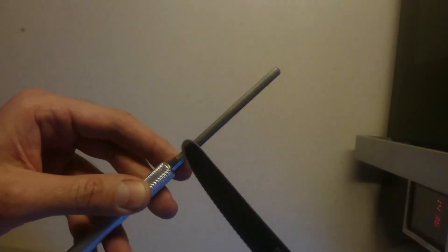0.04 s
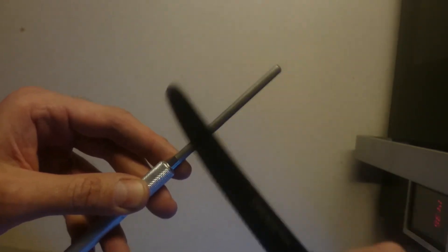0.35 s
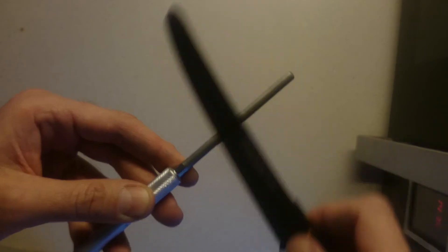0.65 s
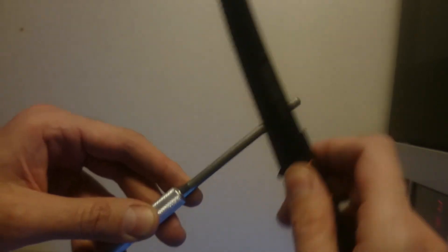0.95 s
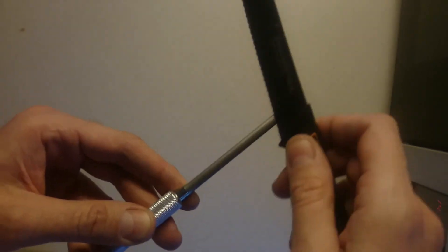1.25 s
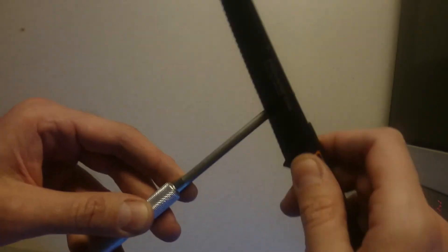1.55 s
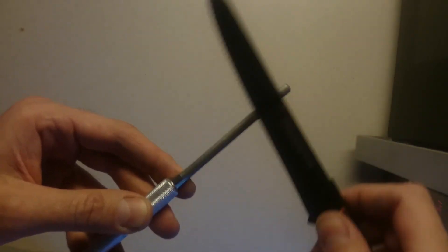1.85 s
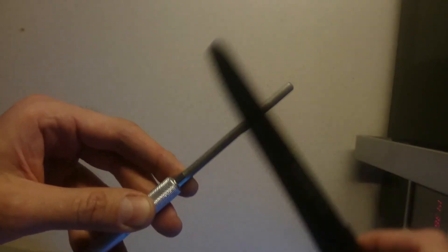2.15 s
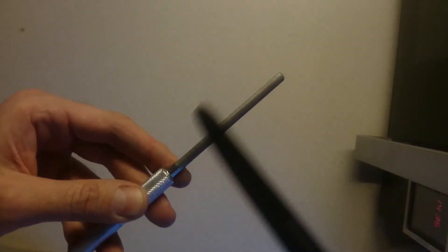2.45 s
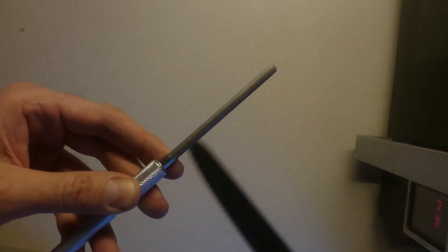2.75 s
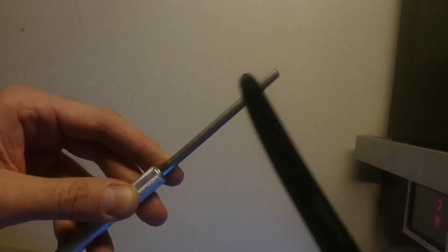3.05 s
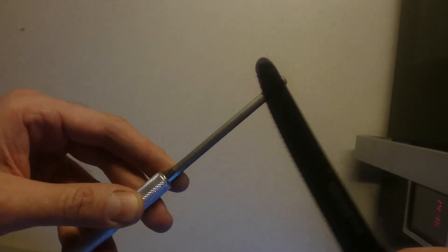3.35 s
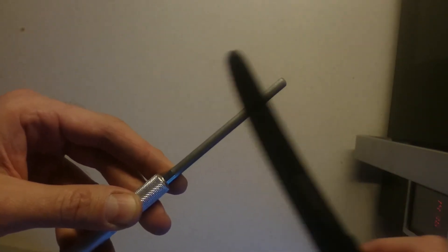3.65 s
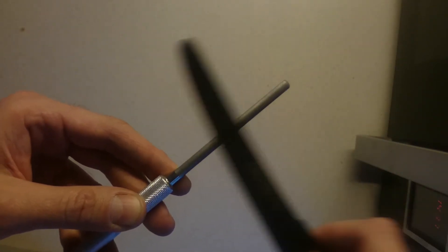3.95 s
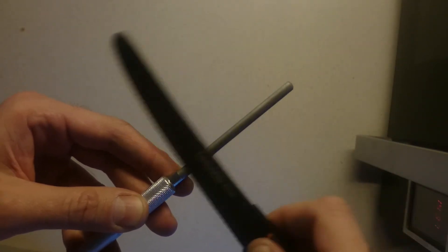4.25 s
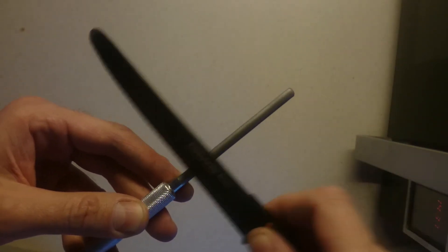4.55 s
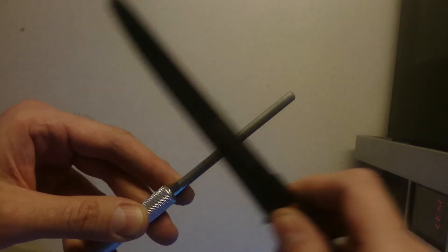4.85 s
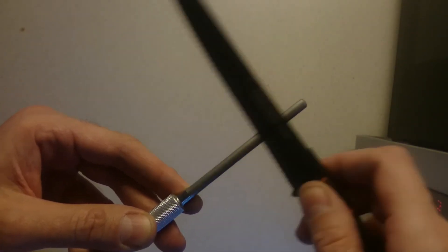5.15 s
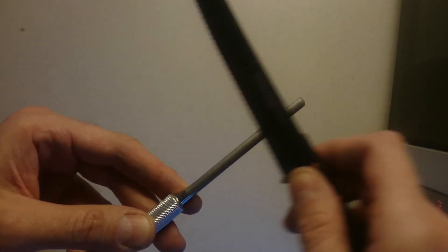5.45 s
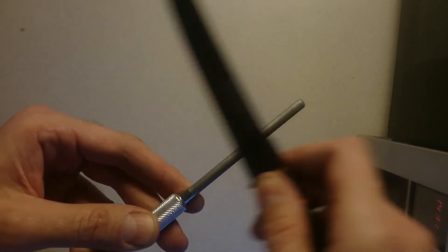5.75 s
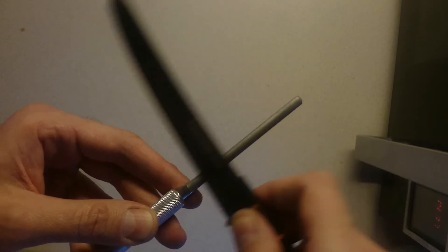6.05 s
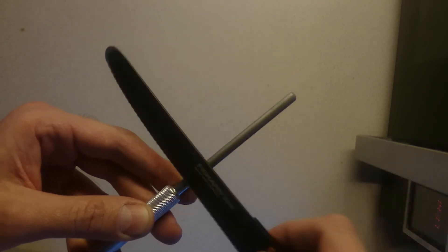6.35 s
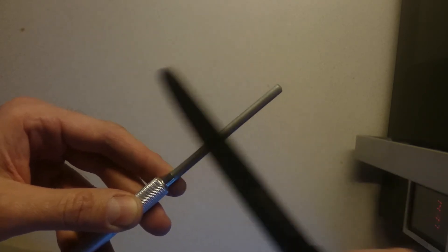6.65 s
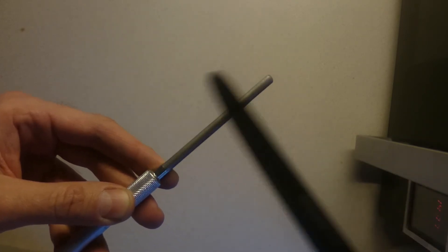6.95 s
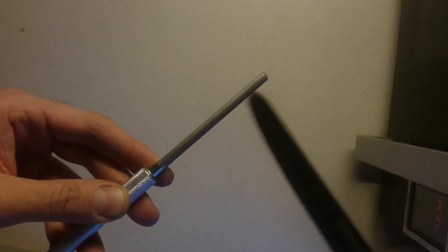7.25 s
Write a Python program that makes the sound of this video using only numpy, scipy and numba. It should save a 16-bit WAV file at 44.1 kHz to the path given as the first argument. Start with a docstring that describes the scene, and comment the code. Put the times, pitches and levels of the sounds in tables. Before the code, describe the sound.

A serrated kitchen knife is drawn over a thin steel sharpening rod in a steady rhythm, about three strokes a second. Each stroke starts with a sharp metallic tap and runs into a short, bright, gritty scrape with faint sliding ring tones. A few times the blade sings on softly. The microphone is close, in a small room with a brief echo, a low motor throb and soft air underneath.

```python
"""In a small room, a serrated kitchen knife is drawn along a thin steel sharpening rod near a phone.
About three times a second the blade lands with a tap, then its teeth and grit rake the rod.
The blade's ringing tones slide in pitch as the contact point moves; a few times one sings on.
The room echoes briefly. Underneath are a low motor throb, soft air and a faint drifting whistle."""
import sys
import numpy as np
from scipy import signal
from scipy.fft import rfft, irfft
from scipy.io import wavfile
from numba import njit

SR = 44100
rng = np.random.default_rng(int(sys.argv[2]) if len(sys.argv) > 2 else 0)


def int16_out(signal):
    """Quantize to a 16-bit WAV file."""
    q = np.round(np.clip(np.atleast_2d(signal).T, -1, 1) * 32767)
    wavfile.write(sys.argv[1], SR, q.astype(np.int16))


N = 331191
TIME = np.arange(N) / SR

# the tones in the motor's throb: (multiple of the turning rate, relative level [dB])
MOTOR_TONES = [(1, -4), (3, -8), (5, 0), (7, -5.5), (9, -10), (11, -19), (13, -21), (15, -14)]
# the tone colour of the room's air: (frequency [Hz], relative level [dB])
AIR_COLOUR = [(25, -3.5), (50, -2.5), (85, -3.5), (170, -12), (300, -14.5), (500, -19.5), (1000, -27),
              (2000, -28.5), (5000, -34), (9000, -42), (15000, -43.5)]
# faint whistles: (start [s], end [s], start pitch [Hz], end pitch [Hz], relative level [dB])
WHISTLES = [(.88, 1.02, 1390, 1470, -58), (1.08, 1.3, 1360, 1060, -63), (2.17, 2.36, 1260, 1530, -66.5),
            (2.48, 2.72, 720, 1090, -64), (2.76, 3.06, 1150, 745, -68), (5.38, 5.52, 1310, 1450, -73),
            (5.6, 5.77, 1600, 2200, -62), (5.87, 6.06, 1210, 1320, -63.5), (6.14, 6.34, 1090, 730, -66)]
# how much the left microphone is favoured over the right: (frequency [Hz], left minus right [dB])
MIC_BALANCE = [(700, 2.5), (950, -6.5), (1250, 9.5), (1650, 0.5), (2400, 3), (3100, 1), (4500, 9),
               (5700, -4.5), (6600, 10.5), (7800, 20), (10500, 17.5), (13300, 14), (15500, 4.5)]
# treble aimed at the phone as the blade turns in the hand: (time [s], treble boost [dB])
BLADE_FACING = [(0, 0), (2.2, 1), (2.7, -3.5), (3.2, -0.5), (3.7, -0.5), (4.25, 4.5), (4.7, 1.5),
                (5.2, 2.5), (5.7, -1.5), (6.2, 4), (6.7, -1), (7.15, -3.5)]
# steady resonances of rod and blade: (pitch [Hz], width [Hz], relative level [dB])
STEEL_RESONANCES = [(1650, 70, 2), (2600, 110, 2), (3100, 110, 0), (3730, 70, 0), (4700, 110, 0),
                    (5060, 70, -1), (5630, 110, 3), (6760, 200, -2), (7860, 170, 0), (8510, 110, 0),
                    (9020, 130, -1), (9940, 250, -2), (11000, 170, -1), (13500, 220, -2)]
# the broad tone colour of the steel: (frequency [Hz], relative level [dB])
STEEL_COLOUR = [(400, -35), (700, -21), (890, -15.5), (1070, -24), (1300, -16), (1700, -10.5), (2300, -9.5),
                (3000, -6.5), (4500, -2), (5700, -0.5), (7800, 2), (10000, 0), (11800, -7.5), (13400, -2),
                (15300, -11)]
# tones left singing as the blade lifts off: (time [s], pitch [Hz], level [dB], time to fade 60 dB [s])
LIFT_RINGS = [(.1, 2100, -58, 1.2), (1.8, 2370, -61, 1.2), (4.3, 1650, -55, .5), (7.2, 2100, -61.5, 2.6),
              (7.2, 4410, -63, 1.4)]
# how fast the blade's bending tone slides, mostly up early on, then down: (time [s], slide [octaves/s])
BEND_SLIDES = [(0, -1), (.7, 1.9), (1.7, 4.5), (2.3, 2), (3.4, -3), (4, -5), (4.7, -3), (5.3, -5.5),
               (6.3, -3.5), (7.2, -3.5)]
# one row per stroke; levels are relative, and fullness is a boost of the lows and mids:
# (landing time [s], tap level [dB], tap's ring pitch [Hz], ring against tap [dB], skid length [s],
#  draw length [s], draw level [dB], skid against draw [dB], fullness [dB], bending pitch [Hz],
#  bending level [dB])
STROKES = [ (-.04, -23, 6500, -11, 0.06, 0.079, -27, -3, 1.5, 1643, -51),
           (.278, -17.5, 7800, -7.5, 0.072, 0.074, -27, -2, 1.5, 1770, -51),
           (.618, -18.5, 6770, -12, 0.066, 0.075, -27, -4.5, 1.5, 1330, -47),
           (0.9508, -21, 6600, -6, .062, 0.086, -27, -11.5, 3.5, 1323, -49),
           (1.259, -12, 6080, -2.5, 0.088, 0.097, -25.5, -14, 2.5, 1283, -48),
           (1.629, -14, 6250, -6, 0.062, 0.096, -25.5, -15.5, 1, 1460, -44),
           (1.9587, -19.5, 4420, -18.5, 0.062, 0.1, -27, -15, 3, 1390, -51),
           (2.2954, -15.5, 5550, -9, 0.063, 0.095, -25.5, -12.5, 1, 1820, -52.5),
           (2.616, -13.5, 6030, -6.5, 0.065, 0.074, -24.5, -6, -0.5, 1920, -55),
           (3.044, -26.5, 4700, -17.5, 0.081, 0.094, -25.5, -18.5, -1, 1807, -53),
           (3.3746, -13, 7230, -2, .055, 0.094, -26, -25, -1, 1777, -56),
           (3.674, -15.5, 5550, -4.5, 0.039, .076, -24, -13, -0.5, 1890, -48.5),
           (3.935, -19.5, 6350, -12, .046, 0.072, -24.5, -38, 1.5, 1382, -55),
           (4.2006, -17, 6950, -3, 0.045, .07, -25, -13, 1, 1408, -55.5),
           (4.4695, -20, 6070, -4, 0.033, 0.073, -27, -15, 3.5, 1373, -50),
           (4.7319, -19, 7500, -5, 0.022, 0.074, -26, -18, 1, 1330, -49.5),
           (4.978, -15.5, 6700, -9, 0.048, 0.054, -26, -9, 0.5, 1240, -50.5),
           (5.217, -22, 5170, -15, 0.059, 0.058, -26.5, -17, -0.5, 1172, -47.5),
           (5.489, -18, 5140, -14, 0.032, 0.062, -27, -13, 0, 1155, -47.5),
           (5.757, -17.5, 6400, -9, 0.031, 0.064, -26, -11, 1, 1148, -47.5),
           (6.024, -22, 6660, -9, 0.035, .061, -29, -12, 2, 1321, -46.5),
           (6.2842, -23, 5700, -6, 0.036, .065, -28.5, -16, 4, 1306, -53),
           (6.54, -20, 6130, -18, 0.04, 0.057, -24, -19.5, 1.5, 1604, -46.5),
           (6.796, -17, 8640, -1.5, 0.034, 0.072, -22, -29, 1, 1763, -51.5),
           (7.078, -18.5, 4530, -6, .035, 0.056, -22, -19, 1, 1780, -58)]

RIGHT_LAG_SAMPLES = 16  # the knife's sound reaches the right microphone this much later


def gain(db):
    """Turn decibels into a number to multiply by."""
    return 10 ** (np.asarray(db) / 20)


def unit_rms(x):
    """Scale a sound so that its average level (rms) is 1."""
    return x / np.sqrt(np.mean(x ** 2))


def unit_energy(x):
    """Scale a sound so that its total energy is 1."""
    return x / np.sqrt(np.sum(x ** 2))


def fade(t, t60):
    """A smooth fade that falls 60 dB in t60 seconds."""
    return np.exp(-np.log(1000) * t / t60)


def add(out, start_s, x):
    """Mix x into out from start_s, dropping what falls outside the scene."""
    i = int(start_s * SR)
    x, i = x[..., max(-i, 0):], max(i, 0)
    out[..., i:i + x.shape[-1]] += x[..., :N - i]


def colour(x, points, size=2048):
    """Shape the tone of x along a curve of (frequency [Hz], level [dB]) points."""
    hz, db = np.transpose(points)
    curve = gain(np.interp(np.log(np.fft.rfftfreq(size, 1 / SR) + 1), np.log(hz), db))
    # build the filter so that it rings only after a sound, never before it
    cepstrum = irfft(np.log(curve))
    cepstrum[1:size // 2] *= 2
    cepstrum[size // 2 + 1:] = 0
    return signal.fftconvolve(x, irfft(np.exp(rfft(cepstrum))))[:len(x)]


def boost_lows(x, db, corner_hz=4000):
    """Raise or lower the lows and mids."""
    low = signal.sosfiltfilt(signal.butter(2, corner_hz, fs=SR, output="sos"), x)
    return x + (gain(db) - 1) * low


def boost_treble(x, db, corner_hz=10500):
    """Raise or lower the highest treble."""
    high = signal.sosfiltfilt(signal.butter(3, corner_hz, "high", fs=SR, output="sos"), x)
    return x + (gain(db) - 1) * high


@njit
def moving_bandpass(x, hz, width_hz):
    """Let through only a band around a pitch that can change at every sample."""
    out, band_state, low_state = np.empty(len(x)), 0., 0.
    for i in range(len(x)):
        tuning, damping = np.tan(np.pi * hz[i] / SR), width_hz / hz[i]
        band = (band_state + tuning * (x[i] - low_state)) / (1 + tuning * (tuning + damping))
        band_state = 2 * band - band_state
        low_state += 2 * tuning * band
        out[i] = damping * band
    return out


def resonate(x, start_hz, end_hz, width_hz):
    """Make x ring at a pitch that slides from start_hz to end_hz; narrower rings longer."""
    return moving_bandpass(x + 1e-18, np.linspace(start_hz, end_hz, len(x)), float(width_hz))


def sliding_tones(rows, width_hz):
    """Breathy tones, made of narrowly filtered noise, that swell, slide and fade."""
    out = np.zeros(N)
    for start, end, start_hz, end_hz, db in rows:
        n = int(max(end - start, .02) * SR)
        tone = resonate(rng.standard_normal(SR)[:n], start_hz, end_hz, width_hz)
        tone = resonate(tone, start_hz, end_hz, 5 * width_hz)
        add(out, start, gain(db) * unit_rms(tone) * np.sin(np.linspace(0, np.pi, n)))
    return out


def room_air(left_db=-56, right_db=-54):
    """Air gives a soft, low rush, partly shared by both sides."""
    shared, left, right = (unit_rms(colour(rng.standard_normal(N), AIR_COLOUR)) for _ in range(3))
    return np.array([gain(left_db) * unit_rms(shared / 2 + left),
                     gain(right_db) * unit_rms(shared / 2 + right)])


def motor(turn_hz=15.7, push_gap_s=.0115, left_db=-57.5, right_db=-45.5):
    """A motor throbs through the desk, stronger on the right."""
    throb = np.zeros(N)
    for multiple, db in MOTOR_TONES:
        hz = multiple * turn_hz
        # each throb is a close pair of pushes, which flips some tones upside down
        flip = np.sign(np.cos(np.pi * hz * push_gap_s))
        throb += gain(db) * flip * np.cos(2 * np.pi * hz * TIME)
    return unit_rms(throb) * gain([[left_db], [right_db]])


def whistle(boost_db=1.5):
    """A faint whistle comes and goes, drifting in pitch."""
    return gain(boost_db) * sliding_tones(WHISTLES, width_hz=55)


def room_echo(x, echo_db, low_t60=0.39, high_t60=0.26, split_hz=7000):
    """The small room adds a short echo that loses its treble first."""
    t = TIME[:SR]
    noise = rng.standard_normal(SR)
    low = signal.sosfiltfilt(signal.butter(2, split_hz, fs=SR, output="sos"), noise)
    tail = low * fade(t, low_t60) + (noise - low) * fade(t, high_t60)
    tail *= np.clip(t / 0.002, 0, 1)
    return x + signal.fftconvolve(x, gain(echo_db) * unit_energy(tail))[:N]


def paths_to_mics(x, echo_db, path_change=0.1995, nearest_s=0.000895, spread_s=.007, shade_db=-6.5):
    """Sound reaches two microphones directly (shaded on the right) and bounces off hands and desk."""
    x = np.pad(x, (0, SR // 64))
    i = np.arange(len(x))
    fine = signal.resample_poly(x, 4, 1)  # four points per sample let delays change smoothly
    mics = []
    for direct in (x, gain(shade_db) * np.roll(x, RIGHT_LAG_SAMPLES)):
        echoes = 0
        for distance, way, flip in rng.uniform(0, 1, (10, 3)):
            # each path grows or shrinks as the knife moves, which sweeps the tone colour
            stretch = path_change * np.sign(way - .5) * (.5 + way % .5)
            delay = SR * (nearest_s + spread_s * distance) * (1 + stretch * (i / len(x) - .5))
            bounce = np.interp(4 * (i - delay), np.arange(len(fine)), fine, left=0)
            echoes += np.sign(flip - .5) * (1 - distance / 2) * bounce
        mics.append(unit_energy(direct + gain(echo_db) * unit_energy(echoes) * np.linalg.norm(x)))
    return np.array(mics) * np.linalg.norm(x)


def balance_mics(left, right):
    """The two microphones share the power unevenly at each frequency."""
    left_share = [(hz, -10 * np.log10(1 + 10 ** (-db / 10))) for hz, db in MIC_BALANCE]
    right_share = [(hz, -10 * np.log10(0.5 + 10 ** (db / 10))) for hz, db in MIC_BALANCE]
    return np.sqrt(2) * np.array([colour(left, left_share), colour(right, right_share)])


def lift_rings():
    """After a few strokes the freed blade sings on with a pure, fading tone."""
    out, t = np.zeros(N), TIME[:SR]
    for start, hz, db, t60 in LIFT_RINGS:
        add(out, start, gain(db) * np.sin(2 * np.pi * hz * t) * fade(t, t60))
    return out


def blade_bending(boost_db=4.5, lead_s=.042, linger_s=0.0038):
    """Each draw makes the blade flex with a low tone whose pitch follows where the rod touches."""
    rows = []
    for lands, _, _, _, skid_s, draw_s, _, _, _, hz, db in STROKES:
        start, end = lands + skid_s - lead_s, lands + skid_s + draw_s + linger_s
        octaves = np.interp(lands, *np.transpose(BEND_SLIDES)) * (end - start)
        half_slide = 2 ** (octaves / 2)
        rows.append((start, end, hz / half_slide, hz * half_slide, db))
    tone = gain(boost_db) * sliding_tones(rows, width_hz=11.4)
    return np.array([tone, np.roll(tone, RIGHT_LAG_SAMPLES)])


def steel(push, ring_db):
    """Rod and blade answer a push with their steady resonances and bright tone colour."""
    ringing = sum(gain(db) * resonate(push, hz, hz, width) for hz, width, db in STEEL_RESONANCES)
    return colour(gain(ring_db) * ringing + push, STEEL_COLOUR)


def tap(tap_db, ring_hz, ring_db, fullness_db, boost_db=20, usual_db=-18.5, dulling=0.41):
    """Steel lands on steel: a crack, a short clang and one stronger ring, all damped by the hands."""
    t = TIME[:4096]
    crack, clang = rng.standard_normal((2, len(t)))
    push = unit_energy(clang * fade(t, t60=0.11)) + gain(1.5) * unit_energy(crack * fade(t, t60=0.013))
    ring = resonate(push, ring_hz, ring_hz, width_hz=420)
    ring = unit_energy(resonate(ring, ring_hz, ring_hz, width_hz=1700))
    body = unit_energy(steel(push, ring_db=-26.5))
    body = boost_lows(body, fullness_db + 3 + dulling * (usual_db - tap_db))  # lighter taps are duller
    knock = unit_energy(body + gain(ring_db) * ring)
    return gain(tap_db + boost_db) * boost_treble(knock, -5)


def pressure(skid_s, draw_s, skid_db, bite_s=0.025, arch_db=2.64, lift_s=0.0603, lift_db_per_s=511.5):
    """How hard the blade presses, in dB: it skids lightly, bites, peaks mid-draw and lifts off."""
    t = np.arange(0, skid_s + draw_s + lift_s, 1 / SR)
    skidding = np.clip((skid_s - t) / bite_s, 0, 1)
    drawn = np.clip((t - skid_s) / draw_s, 0, 1)
    lifted_s = np.maximum(t - skid_s - draw_s, 0)
    return skid_db * skidding - arch_db * (2 * drawn - 1) ** 2 - lift_db_per_s * lifted_s


def sliding_blade(push, count=70, slide=0.149, width_hz=55):
    """The blade grows on one side of the rod and shrinks on the other, so its tones slide both ways."""
    detunes, ways, flips = rng.uniform(-1, 1, (count, 3)).T
    pitches = np.linspace(2050, 15000, count) + 130 * detunes
    half_slides = slide * (np.sign(ways) + ways) / 4
    return sum(np.sign(flip) * resonate(push, hz * (1 - half), hz * (1 + half), width_hz)
               for hz, half, flip in zip(pitches, half_slides, flips))


def scrape(press_db, fullness_db, tooth_hz=330, tooth_db=-3, judder_hz=110, judder_db=1.37, dulling=0.31):
    """Teeth catch unevenly and grit rasps along the rod, setting the steel ringing."""
    n = len(press_db)
    grit, grain, gaps, sizes, wobble = rng.standard_normal((5, SR // 2))
    catches = (np.cumsum(np.exp(.45 * gaps)) * SR / tooth_hz).astype(int)
    catches = catches[catches < n]
    teeth = np.zeros(n)
    teeth[catches] = gain(5.5 * np.tanh(sizes[:len(catches)]))
    rasp = grit[:n] * gain(6.4 * np.tanh(grain[:n]))
    push = unit_rms(rasp) + gain(tooth_db) * unit_rms(teeth)
    sound = unit_rms(steel(unit_rms(sliding_blade(push)) + unit_rms(push), ring_db=-5))
    sound = boost_lows(sound, fullness_db - 1 - dulling * press_db)  # lighter contact is duller
    judder = np.interp(TIME[:n] * judder_hz, np.arange(len(wobble)), wobble)
    return sound * gain(press_db + judder_db * judder)


def knife_strokes():
    """Each stroke taps, scrapes and flexes the blade; the treble rises and falls as the blade turns."""
    out = blade_bending()
    for lands, tap_db, ring_hz, ring_db, skid_s, draw_s, draw_db, skid_db, fullness_db, _, _ in STROKES:
        draw = gain(draw_db) * scrape(pressure(skid_s, draw_s, skid_db), fullness_db)
        add(out, lands, paths_to_mics(draw, echo_db=4))
        knock = tap(tap_db, ring_hz, ring_db, fullness_db)
        add(out, lands, paths_to_mics(knock, echo_db=-3))
    return boost_treble(out, np.interp(TIME, *np.transpose(BLADE_FACING)))


def scene():
    """The knife, earlier and brighter on the left, sounds in the room over the quiet background."""
    left, right = knife_strokes() + lift_rings()
    knife = balance_mics(room_echo(left, echo_db=-15.5), room_echo(right, echo_db=-6.5))
    return knife + whistle() + room_air() + motor()


def record(dry, cutoff_hz=15900):
    """The phone cuts off the very highest treble."""
    return signal.sosfilt(signal.ellip(10, .2, 70, cutoff_hz, fs=SR, output="sos"), dry)


dry = scene()
out = record(dry)
int16_out(out)
```